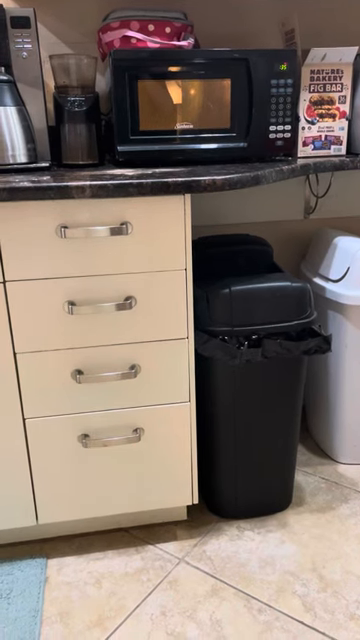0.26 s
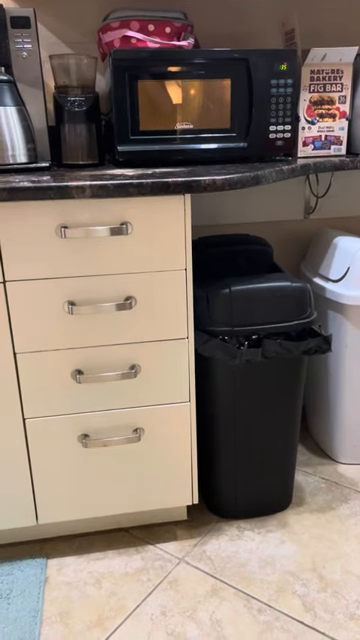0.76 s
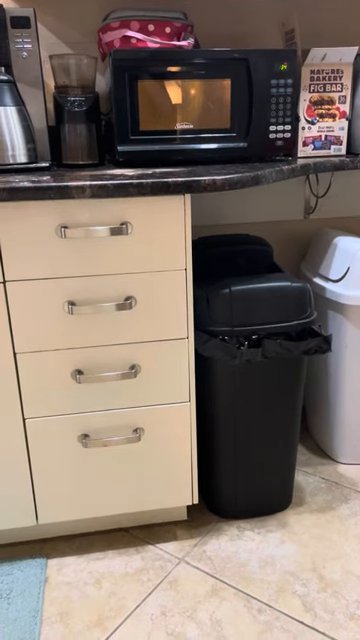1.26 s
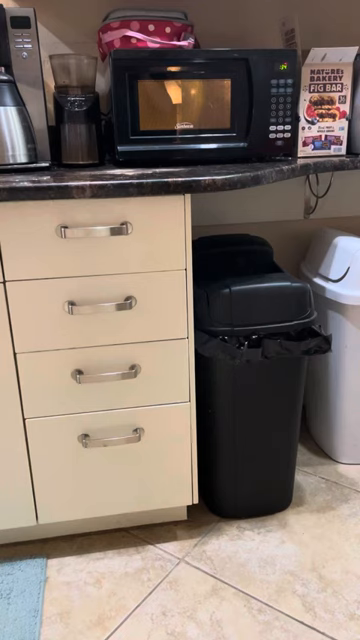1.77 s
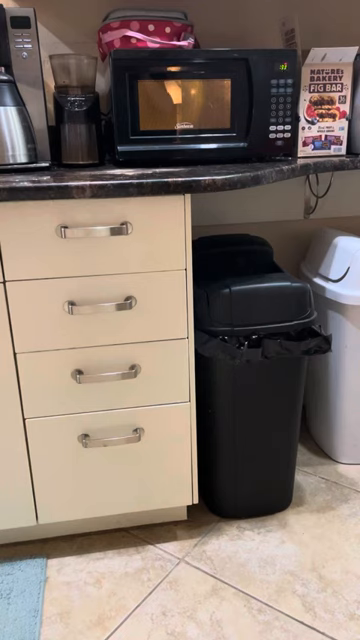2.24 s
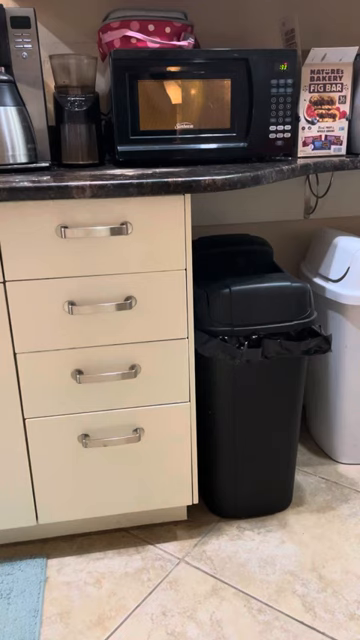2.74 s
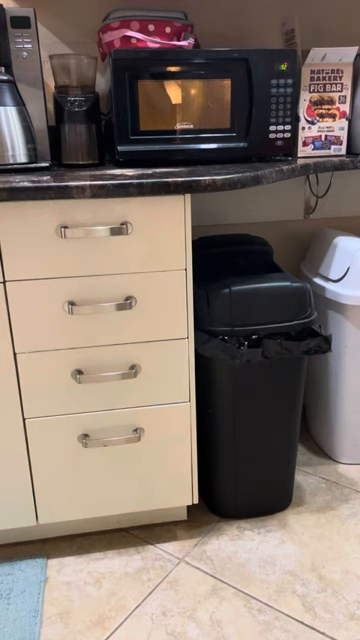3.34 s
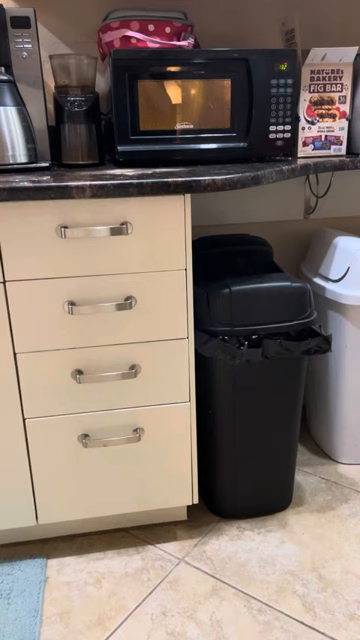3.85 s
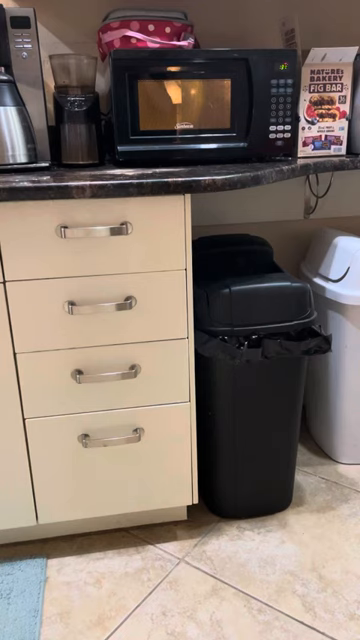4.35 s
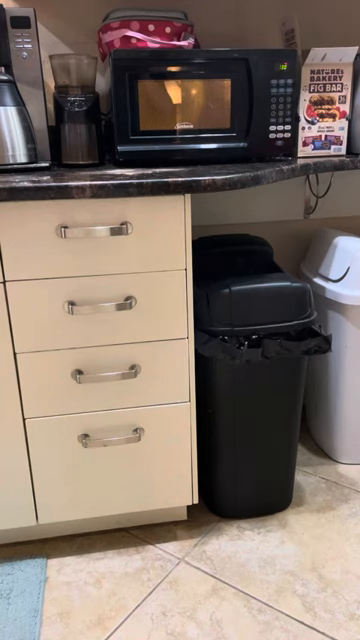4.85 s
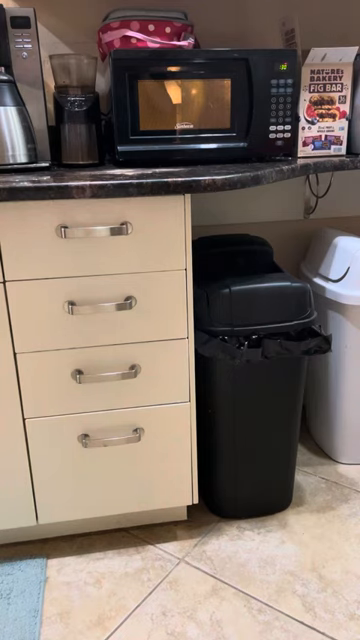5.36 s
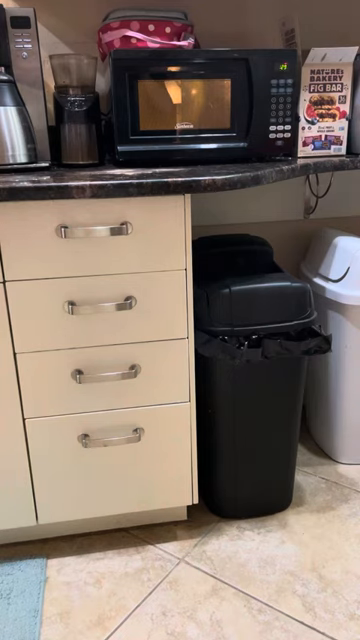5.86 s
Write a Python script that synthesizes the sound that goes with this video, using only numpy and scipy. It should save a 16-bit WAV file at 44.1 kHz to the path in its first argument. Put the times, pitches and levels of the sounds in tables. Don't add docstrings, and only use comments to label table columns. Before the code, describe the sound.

A microwave oven hums steadily while its cabinet knocks and rattles, with three hard bangs, light ticks and faint glassy clinks near the end.

```python
import sys
import numpy as np
from scipy import signal
from scipy.fft import rfft, irfft
from scipy.io import wavfile
from scipy.ndimage import uniform_filter1d

SR = 44100
rng = np.random.default_rng(int(sys.argv[2]) if len(sys.argv) > 2 else 0)


def wrap_up_sound(samples):
    columns = np.atleast_2d(samples).T
    tamed = np.clip(columns, -1, 1)
    steps = np.round(tamed * 32767).astype(np.int16)
    wavfile.write(sys.argv[1], SR, steps)


def linear_from_db(decibels):
    return 10 ** (np.asarray(decibels, float) / 20)


N = 269010

MAINS_HZ = 60
PORT_GAP = 2
REBOUNDS = 5
GAP_GROWTH, CLATTER_FADE = 1.3, 1.34
TICK_T60_S = 0.049

# mains_multiple, level_db
HUM = [(2, -46.5), (3, -48), (4, -41), (5, -58.5), (6, -44), (7, -100.5), (8, -58), (10, -61), (11, -61.5)]
# pitch_hz, width_hz, steady_share (0-1), level_db
MOTOR_TONES = [(48.2, 3, 0, -58), (163.2, 1.7, 0.1, -48.5), (324.4, 2.6, 0.9, -52.5), (1408, 5.1, 0, -74.5),
               (2660, 110, 0.7, -75.5)]
# pitch_hz, level_db (per Hz)
RUSH_COLOUR = [(20, -51), (45, -32), (85, -12), (110, -17), (180, -14), (230, -16.5), (400, -19.5),
               (650, -11), (800, -22), (1000, -27.5), (2700, -40.5), (5000, -45.5), (8000, -57),
               (16000, -81)]
# time_s, level_db
RUSH_SWELL = [(0.0, -60.5), (1.0, -61), (3.5, -60), (4.101, -58.5), (4.66, -57), (4.9, -60), (6.1, -61)]
# pitch_hz, level_db
HISS_COLOUR = [(3000, -28.5), (5000, -6.5), (8000, -3.5), (11000, -10.5), (16000, -26)]
# pitch_hz, width_hz, boost_db
CABINET = [(104, 17, 9.5), (209, 81, 2), (262.3, 72, 8.5), (373.7, 12.2, 12), (472, 11, -3), (520, 280, 4),
           (715, 15, -1), (739, 33, 2), (1380, 30, 2), (2420, 170, -3.5), (2720, 640, 5), (4350, 120, 1)]
# pitch_hz, t60_s
KITCHEN_DECAY = [(100, 0.18), (500, 0.23), (2000, 0.28), (6000, 0.23), (14000, 0.14)]

# pitch_hz, level_db
THUD_COLOUR = [(40, -32.5), (80, 3.5), (120, 2), (250, 2), (450, -1.5), (700, 2.5), (850, -9), (1100, -49)]
# pitch_hz, level_db
CLATTER_COLOUR = [(500, -31), (1000, 4.5), (1500, 6), (2700, -3), (3500, -13.5), (6000, -25), (16000, -49)]
# pitch_hz, level_db
TICK_COLOUR = [(2500, -27.5), (5000, -8), (7500, 10), (11000, -1), (16000, -6.5)]
# start_s, level_db
CLINKS = [
    (5.154, -52),
    (5.21, -60),
    (5.393, -53),
]
# pitch_hz, level_db, t60_s
GLASS = [(2730, -3, 0.02), (4000, -1, 0.011), (3700, -7, 0.012), (6550, -10.5, .03), (8480, -14, .05),
         (13660, -5.5, 0.03), (14150, -4, .02)]
# start_s, ring_db, ring_hz, fizz_db
TICKS = [(0.6731, -47.5, 4100, -82), (0.895, -55, 3380, -62), (1.068, -24, 2480, -57.5),
         (1.0937, -29.5, 4050, -54.5), (1.13, -45.5, 3830, -58.5), (1.276, -53.5, 6860, -57.5),
         (1.588, -63, 3430, -65), (2.6372, -54, 4340, -73.5), (2.9917, -34, 2110, -70),
         (3.109, -30, 3800, -64), (3.1408, -40, 3000, -69.5), (3.4587, -65, 3380, -74),
         (3.698, -54, 3580, -72.5), (3.921, -53, 5600, -67.5), (4.4932, -24.5, 4390, -50.5),
         (4.5102, -44.5, 4100, -55), (4.5298, -39, 3710, -56.5), (4.551, -36, 3220, -58),
         (4.9402, -44.5, 2240, -72.5), (4.95, -49, 3600, -63), (5.09, -58.5, 6150, -60.5),
         (5.7, -57, 4130, -74), (5.9611, -51.5, 3400, -67), (6.02, -54, 3400, -65.5)]
# start_s, level_db, t60_s
SETTLING = [
    (4.599, -51.5, 1.4),
]
# start_s, level_db, pitch_hz, t60_s
PUNCHES = [
    (1.097, -8, 658, 0.05),
    (1.121, -3, 215, 0.05),
    (3.12, -5, 730, 0.035),
    (3.149, -16, 265, 0.08),
    (4.4935, 0.2, 640, 0.04),
    (4.506, -6, 700, 0.05),
]
# start_s, thud_db, clatter_db, fade_db_per_s, first_gap_s
BANGS = [
    (1.095, -7.5, -25, 143.5, 0.012),
    (3.116, -14.5, -31.5, 120, 0.011),
    (4.492, -7.5, -26.5, 247, 0.012),
    (4.545, -12, -27, 151.5, 0.013),
]
PANELS_HZ = [243, 360, 220, 676, 120, 562]
# start_s, thud_db, ring_hz, clatter_db
BUMPS = [(0.597, -30.5, 224, -69), (0.678, -27.5, 361, -50.5), (0.73, -27.5, 75.4, -48),
         (1.037, -27.5, 568, -45), (1.069, -10.5, 263, -37.5), (1.399, -41, 230, -61),
         (1.549, -28.5, 232, -48), (1.581, -26.5, 188, -49.5), (1.938, -33, 260, -52.5),
         (2.403, -32.5, 246, -55), (2.458, -29, 107.5, -53.5), (2.543, -34, 233, -57.5),
         (2.637, -31.5, 185, -47.5), (2.658, -23, 220, -49), (2.743, -21, 630, -41.5),
         (2.994, -18, 670, -32), (3.029, -35, 342, -40), (3.05, -14.5, 617, -42.5), (3.554, -43, 237, -72),
         (4.179, -25.5, 373, -50), (4.468, -14.5, 560, -33.5), (4.484, -18, 265, -35),
         (4.944, -30.5, 171, -55), (5.818, -31, 373, -52.5), (6.043, -27, 258, -52)]
# thud_db, t60_s
RATTLE_TIME = [(-22.5, 0.15), (-22, 0.087), (2.5, 0.081)]
# clatter_db, centre_hz
CLATTER_PITCH = [(-42, 1200), (-35.5, 1300), (-25.5, 2900)]

# pitch_hz, level_db
MID_COLOUR = [(20, -27.5), (40, -12), (55, 0), (6000, 1.5), (8000, -6), (9500, -15.5), (12000, -21),
              (14000, -10), (15200, -5), (16000, -14)]
# pitch_hz, level_db
SIDE_COLOUR = [(20, -57), (60, -40.5), (110, -43), (200, -27.5), (380, -19.5), (700, -11.5), (1290, -2),
               (1900, -13), (2500, -2), (3800, -0.5), (4400, -9.5), (5500, -1.5), (16000, -1.5)]
# pitch_hz, level_db
FAR_PORT = [(300, -6.5), (1200, -5), (2000, 1.5)]


def evened(x):
    return x / np.sqrt(np.mean(x ** 2) + 1e-20)


def read(points, hz):
    f, value = np.transpose(points)
    return np.interp(np.log(hz + 1), np.log(f + 1), value)


def colour(x, points, peaks=()):
    hz = abs(np.fft.fftfreq(2 ** 14, 1 / SR))
    db = read(points, hz)
    for f, width, boost in peaks:
        db = db + boost / (1 + (2 * (hz - f) / width) ** 2)
    log_gain = np.log(linear_from_db(db))
    phase = -signal.hilbert(log_gain).imag
    taps = np.fft.ifft(np.exp(log_gain + 1j * phase)).real[:8192]
    return signal.oaconvolve(np.atleast_2d(x), taps[None], axes=1)[:, :N]


def shade(x, points):
    mirrored = np.r_[x, x[::-1]]
    gain = linear_from_db(read(points, np.fft.rfftfreq(2 * N, 1 / SR)))
    return irfft(rfft(mirrored) * gain, 2 * N)[:N]


def drift(seconds, shape):
    size = int(seconds * SR)
    smooth = uniform_filter1d(rng.standard_normal(shape), size)
    return evened(uniform_filter1d(smooth, size))


def whistle(hz, width, steady):
    r = np.exp(-np.pi * width / SR)
    slow = signal.lfilter([1], [1, -r], rng.standard_normal((N, 2)) @ [1, 1j])
    slow = steady + (1 - steady) * slow / slow.std()
    return evened((slow * np.exp(2j * np.pi * hz * np.arange(N) / SR)).real)


def dying(t, db, t60):
    return linear_from_db(db - 60 * t / max(t60, 0.01))


def rattle(events, rise):
    t = np.arange(SR // 2) / SR
    power = np.zeros(N + SR)
    for s, db, t60 in events:
        power[round(s * SR):][:len(t)] += (dying(t, db, t60) * (1 - np.exp(-t / rise))) ** 2
    grit = evened(rng.standard_normal(N) * linear_from_db(1.45 * rng.exponential(1, N)))
    return np.sqrt(power[:N]) * grit


def struck(events, sharpness):
    t = np.arange(SR // 4) / SR
    out = np.zeros(N + SR)
    for s, db, hz, t60 in events:
        grit = rng.standard_normal(len(t))
        band = evened(signal.lfilter(*signal.iirpeak(hz, sharpness, SR), grit))
        out[round(s * SR):][:len(t)] += dying(t, db, t60) * (1 - np.exp(-t / 0.0016)) * band
    return out[:N]


def kitchen(x):
    taps = np.zeros((2, SR))
    at = np.arange(200, SR - 20, 20) + rng.integers(0, 20, (2, (SR - 201) // 20))
    np.put_along_axis(taps, at, rng.choice([-1., 1.], at.shape), 1)
    hz, t, z = signal.stft(taps, SR, nperseg=256)
    fade = linear_from_db(-60 * t / read(KITCHEN_DECAY, hz)[:, None])
    tail = signal.istft(z * fade, SR, nperseg=256)[1]
    return signal.fftconvolve(np.atleast_2d(x), tail / np.linalg.norm(tail[0]), axes=1)[:, :N]


def fan():
    air = rng.standard_normal((2, N)) * linear_from_db(drift(0.033, N))
    s, db = np.transpose(RUSH_SWELL)
    swell = linear_from_db(np.interp(np.arange(N) / SR, s, db) + 19)
    rush = evened(colour(air, RUSH_COLOUR, CABINET)) * swell
    puffs = rng.standard_normal((2, N)) * linear_from_db(3.0 * drift(0.03, N) + 2.5 * drift(0.31, N))
    return rush + linear_from_db(-76.5) * evened(colour(puffs, HISS_COLOUR))


def transformer():
    t = np.arange(N) / SR
    out = np.zeros(N)
    for multiple, db in HUM:
        breathing = linear_from_db(db + 1.2 * drift(0.07, N))
        turns = multiple * MAINS_HZ * t + rng.random()
        out += breathing * np.sqrt(2) * np.cos(2 * np.pi * turns)
    for hz, width, steady, db in MOTOR_TONES:
        out += linear_from_db(db) * whistle(hz, width, np.clip(steady, 0, 1))
    return out


def clinks():
    t = np.arange(SR // 4) / SR
    ring = sum(linear_from_db(db - 60 * t / t60) * np.sin(2 * np.pi * hz * t) for hz, db, t60 in GLASS)
    touches = rattle([(s, db, 0.03) for s, db in CLINKS], rise=0.00027)
    return linear_from_db(-12.5) * signal.oaconvolve(touches, ring)[:N]


def ticks():
    fizz_events = [(s, fizz_db, TICK_T60_S) for s, _, _, fizz_db in TICKS]
    ring_events = [(s, ring_db, hz, TICK_T60_S) for s, ring_db, hz, _ in TICKS]
    fizz = linear_from_db(7.5) * colour(rattle(fizz_events, rise=0.0004), TICK_COLOUR)[0]
    trickle = colour(rattle(SETTLING, rise=0.02), HISS_COLOUR)[0]
    return fizz + trickle + linear_from_db(-4.5) * struck(ring_events, 5.7)


def blows():
    after = np.cumsum(np.r_[0, GAP_GROWTH ** np.arange(REBOUNDS)])
    rows = [BUMPS]
    for s, thud, clatter, fade, gap in BANGS:
        delay = gap * after
        rows.append(np.c_[s + delay, thud - fade * delay, PANELS_HZ, clatter - CLATTER_FADE * fade * delay])
    rows = np.vstack(rows)
    centre_hz = np.interp(rows[:, 3], *np.transpose(CLATTER_PITCH))
    t60 = np.interp(rows[:, 1], *np.transpose(RATTLE_TIME))
    return np.c_[rows, centre_hz, t60]


def thuds(hits):
    t = np.arange(SR // 4) / SR
    rings = np.zeros(N + SR)
    for s, db, hz, *_, t60 in [*hits, *PUNCHES]:
        swell = (1 - np.exp(-t * hz / 0.47)) * dying(t, db, 0.56 * t60)
        rings[round(s * SR):][:len(t)] += swell * np.sin(2 * np.pi * hz * t)
    shake = rattle(hits[:, [0, 1, 5]], rise=0.0037)
    return linear_from_db(-3.5) * rings[:N] + linear_from_db(4.0) * colour(shake, THUD_COLOUR, CABINET)[0]


def clatter(hits):
    chatter = rattle(hits[:, [0, 3, 5]], rise=0.0014)
    panels = linear_from_db(2.0) * colour(chatter, CLATTER_COLOUR, CABINET)[0]
    return panels + linear_from_db(-12) * struck(hits[:, [0, 3, 4, 5]], 2.8)


def knocks():
    hits = blows()
    return thuds(hits) + clatter(hits) + ticks()


def scene():
    hits = knocks() + clinks()
    hum = 1.625 * transformer()
    near = hum + linear_from_db(2.0) * hits
    far = 0.17 * hum + linear_from_db(-3.5) * hits
    late_far = np.pad(far, (PORT_GAP, 0), 'edge')[:N]
    return np.array([near, late_far]) + linear_from_db(0.5) * kitchen(hits) + fan()


def top_cut(x):
    return signal.sosfilt(signal.butter(12, 15750, fs=SR, output="sos"), x)


def record(dry):
    near, far = dry[0], shade(dry[1], FAR_PORT)
    mid = shade((near + far) / 2, MID_COLOUR)
    side = shade((near - far) / 2, SIDE_COLOUR)
    side = side + 0.35 * np.gradient(mid)
    return top_cut(np.array([mid + side, mid - side]))


dry = scene()
out = record(dry)
wrap_up_sound(out)
```